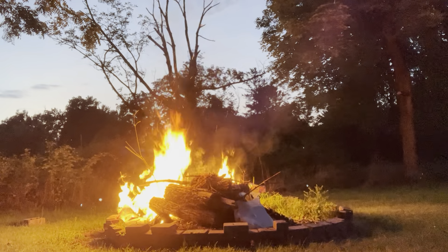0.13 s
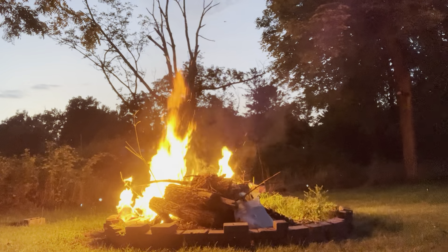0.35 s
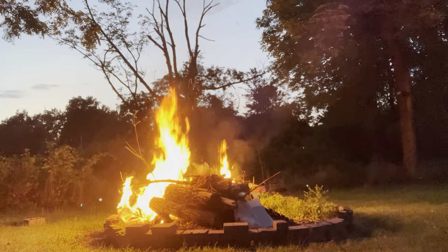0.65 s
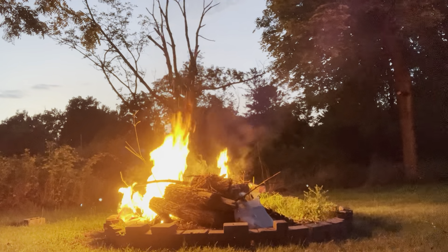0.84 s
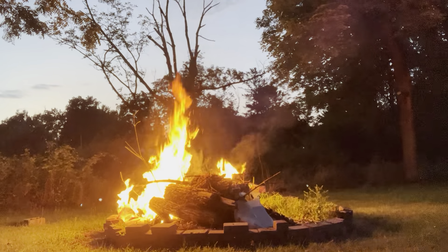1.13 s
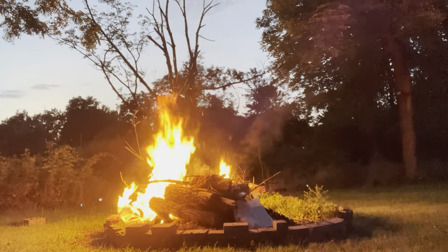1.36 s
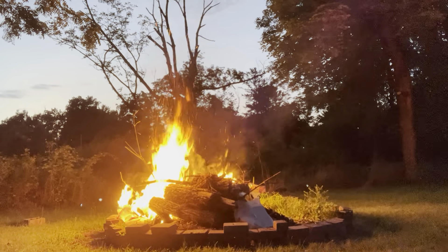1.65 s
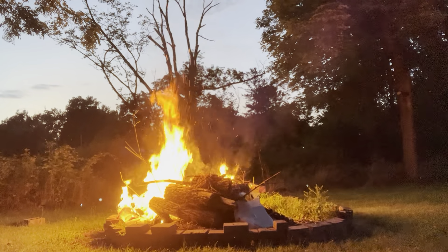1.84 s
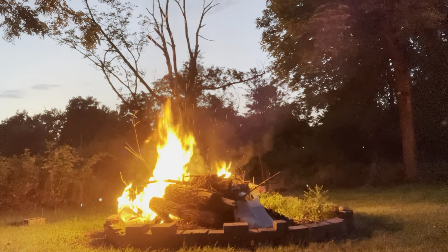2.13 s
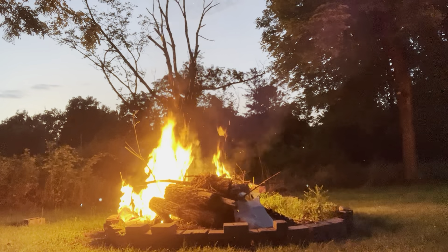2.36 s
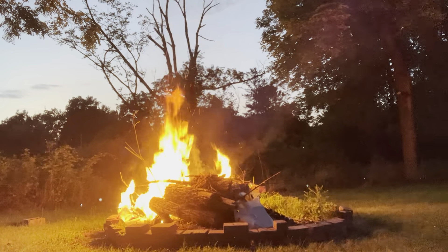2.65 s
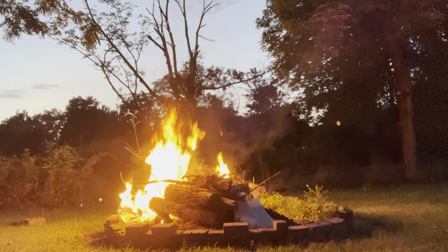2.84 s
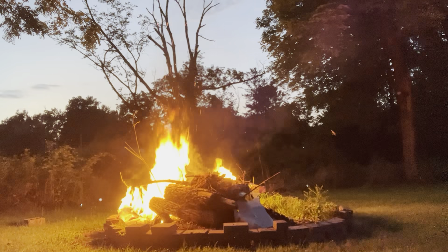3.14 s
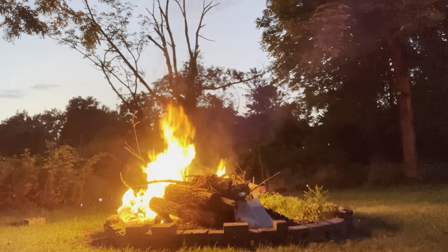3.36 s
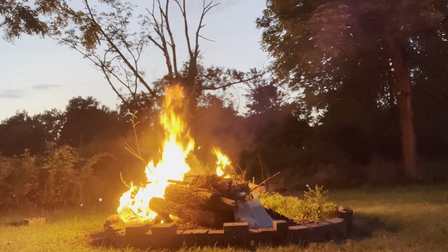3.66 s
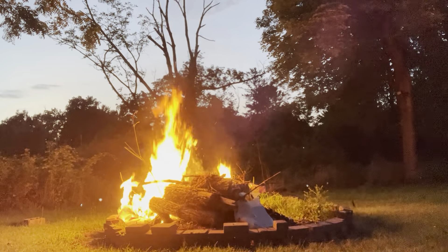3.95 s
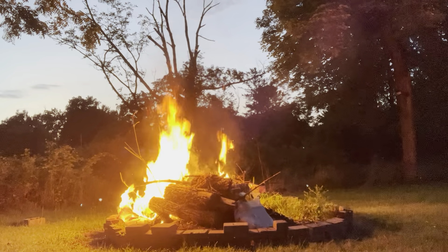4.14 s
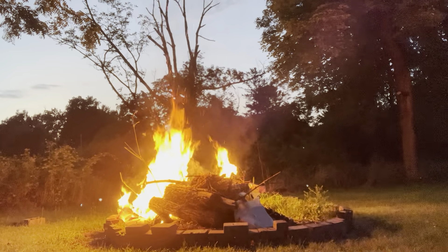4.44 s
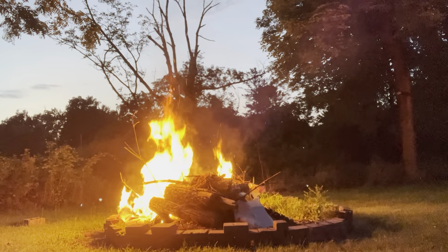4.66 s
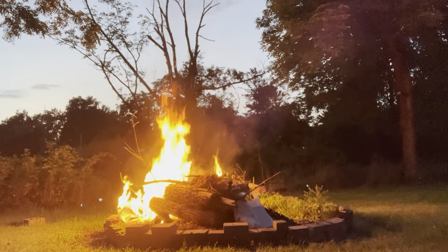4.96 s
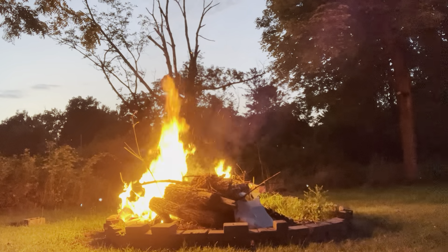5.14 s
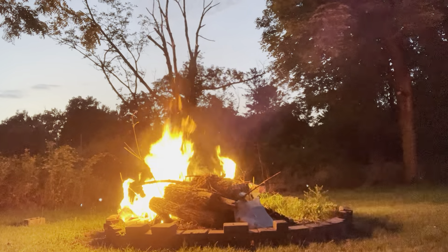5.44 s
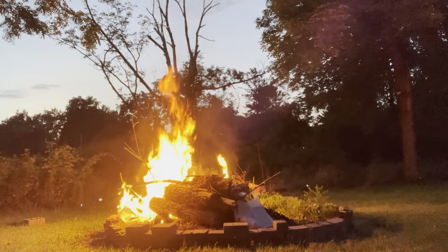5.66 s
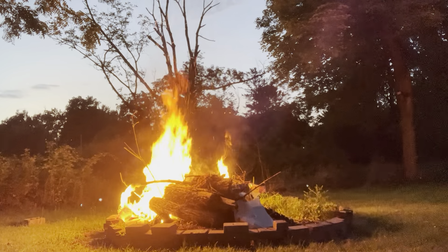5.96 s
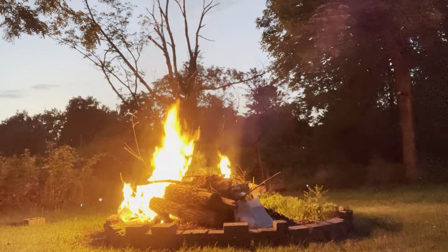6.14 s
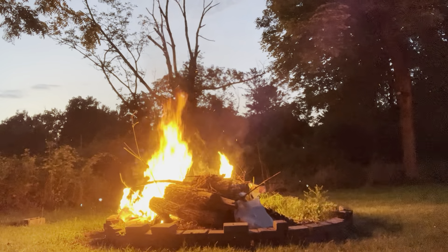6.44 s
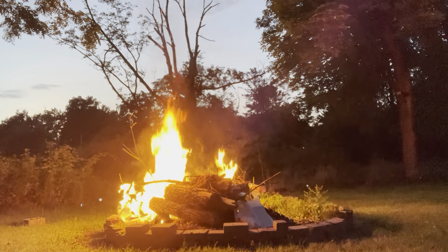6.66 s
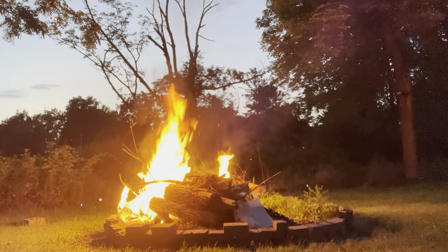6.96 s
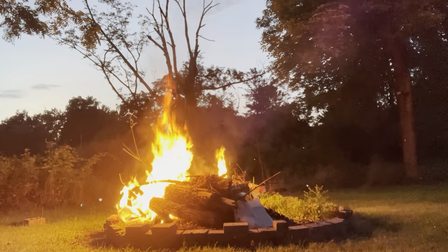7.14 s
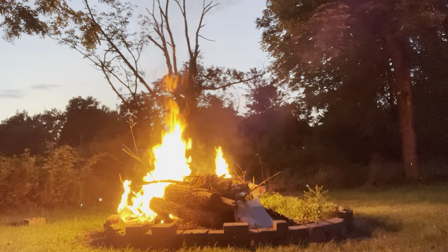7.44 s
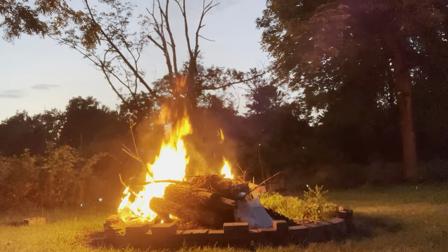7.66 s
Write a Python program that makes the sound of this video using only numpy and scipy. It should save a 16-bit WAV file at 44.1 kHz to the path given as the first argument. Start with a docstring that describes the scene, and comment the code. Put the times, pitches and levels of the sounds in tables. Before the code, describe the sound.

Outdoor fire heard close in stereo: constant tiny crackles, frequent crisp pops with hollow knocks, a quiet bassy flutter of flames and thin sizzling. Strong cracks punctuate the first two seconds, smaller pops fill the middle, two very loud snaps come after five seconds, then it thins somewhat. Leaves scatter the loudest pops into a quick, bright echo; the night air is quiet.

```python
"""In a clearing at dusk, a bonfire of logs and rubbish burns near a phone.
Gas pockets burst in the wood: impulses and short noise ring filters, heard as dry snaps and knocks.
Fine crackle uses many weaker bursts; shaped noise makes the flutter of flames, hiss and night air.
The trees throw each pop back as a bright wash of fading noise.
The phone's limiter holds down the loudest cracks, and a filter cuts the extreme treble."""
import sys
import numpy as np
from scipy import signal
from scipy.fft import rfft, irfft
from scipy.io import wavfile
from scipy.ndimage import uniform_filter1d, minimum_filter1d

SR = 44100
rng = np.random.default_rng(int(sys.argv[2]) if len(sys.argv) > 2 else 0)


def persist_wave(psi):
    """Save psi, clipped to +-1, as 16-bit WAV."""
    counts = np.round(np.clip(psi, -1, 1) * 32767).astype(np.int16)
    wavfile.write(sys.argv[1], SR, np.atleast_2d(counts).T)


N = 343980
TIME = np.arange(N) / SR  # seconds
POP_SIZE = 1024  # samples in one pop
POP_HZ = np.fft.rfftfreq(POP_SIZE, 1 / SR)
LEVEL_SAMPLES = 0.002 * SR  # pop levels are stated as rms over 2 ms
CAVITY_HZ = 1650  # usual pitch of a gas pocket

# Larger bursting pockets: t/s, crack level/dB, knock level/dB, cavity pitch f/Hz,
# level thrown at the trees/dB
POCKETS = [(0.0775, -34, -42, 1924, -68), (0.129, -26.5, -31.5, 3580, -42.5), (0.1533, -35, -46, 1590, -56),
           (0.1658, -33, -42.5, 1900, -51), (0.216, -39.5, -50.5, 1700, -57),
           (0.2975, -28.5, -39.5, 3130, -40), (0.3201, -35.5, -45, 1230, -60),
           (0.4392, -32, -50.5, 1550, -47), (0.456, -40, -48.5, 1900, -62), (0.578, -33, -50, 1420, -61),
           (0.783, -30, -40, 1850, -42), (0.8155, -36, -48, 1600, -64), (0.8681, -42, -44, 1580, -56),
           (0.8868, -39, -40, 2150, -44), (0.8976, -32, -40, 1700, -40), (0.9134, -16, -24, 1760, -23.5),
           (0.982, -27, -37.5, 1600, -54), (1.002, -32, -38, 1560, -35), (1.1905, -36, -43, 1390, -47),
           (1.2267, -35, -29.5, 1230, -38), (1.3881, -25, -32.5, 1620, -33),
           (1.4026, -23, -17, 3210, -24.5), (1.55, -32.5, -35, 1460, -27.5), (1.5599, -30, -52, 1530, -39),
           (1.5704, -32, -61, 1436, -50), (1.73, -49, -41, 1570, -48), (1.738, -31.5, -41, 1540, -48),
           (1.8642, -30.5, -38.5, 2000, -46.5), (2.076, -40, -60, 1770, -62), (2.1572, -40, -47, 2100, -74),
           (2.2877, -39, -43.5, 1140, -52), (2.324, -30, -38, 1770, -51), (2.377, -31, -52, 1800, -53),
           (2.392, -31, -34.5, 1660, -42), (2.4383, -28.5, -45, 2000, -43), (2.4714, -29.5, -34, 1600, -59),
           (2.525, -38, -51, 1960, -46), (2.591, -41, -49, 1400, -49), (2.6274, -36.5, -47, 1600, -61),
           (2.6484, -36, -43, 1590, -50), (2.7472, -42, -52, 1800, -50), (2.7978, -39, -46, 1500, -54),
           (2.8148, -47, -31, 1240, -69), (3.0037, -36.5, -42.5, 1540, -52),
           (3.1383, -35, -50, 2000, -46.5), (3.1495, -34, -54, 1400, -65), (3.18, -41, -49, 1400, -62),
           (3.1925, -31.5, -35.5, 2680, -66), (3.363, -40, -42.5, 2040, -60),
           (3.4373, -38, -43.5, 1820, -49), (3.4805, -45, -43, 1730, -64), (3.5745, -36.5, -58, 1650, -50),
           (3.6306, -39, -45, 1910, -45.5), (3.6764, -37.5, -41.5, 1930, -66),
           (3.8545, -39.5, -52.5, 1770, -53), (3.9078, -43, -43, 1650, -46), (3.929, -36, -58, 1450, -40.5),
           (4.037, -33, -47.5, 1850, -54), (4.0429, -53, -27.5, 1830, -48),
           (4.0915, -28.5, -40, 1390, -41.5), (4.157, -35, -45, 2100, -53),
           (4.162, -38.5, -43, 2000, -44.5), (4.2428, -37.5, -65, 1400, -64),
           (4.3215, -32, -35.5, 1740, -49), (4.3412, -31.5, -43, 1590, -50),
           (4.3629, -33.5, -48, 1880, -49), (4.4218, -24, -32, 1100, -38), (4.53, -43, -40.5, 1740, -59),
           (4.543, -39, -55, 1300, -54), (4.5844, -37.5, -42, 1650, -56), (4.675, -32, -49, 1650, -51),
           (4.7292, -32, -42, 1500, -48), (4.787, -39, -40.5, 1440, -46), (4.8133, -40.5, -50, 1760, -50),
           (4.953, -31.5, -30, 1940, -42.5), (5.262, -39, -41.5, 1500, -50), (5.305, -40, -48.5, 1890, -59),
           (5.3893, -14.5, -15.5, 1930, -27), (5.4235, -30, -35, 1700, -52), (5.5147, -40, -45, 1900, -52),
           (5.5318, -15, -24.5, 2080, -29.5), (5.5674, -27.5, -38, 1240, -37),
           (5.697, -40, -52.5, 1550, -64), (5.7887, -42, -40, 1800, -46), (5.89, -28.5, -33, 2280, -43.5),
           (5.915, -38, -40.5, 1920, -54), (5.967, -52, -44.5, 1450, -64), (6.1112, -44.5, -34, 1460, -45),
           (6.266, -35, -39, 2430, -45.5), (6.4088, -36.5, -46, 1830, -42.5),
           (6.5918, -26.5, -38, 1640, -46), (6.7948, -37.5, -50.5, 2500, -53),
           (6.8511, -37, -51.5, 1720, -60), (6.8675, -39.5, -47.5, 1540, -53),
           (6.896, -40.5, -60, 1700, -60), (6.946, -33, -38, 1710, -52), (6.9848, -38, -51, 2200, -66),
           (7.0842, -25.5, -29.5, 1010, -40.5), (7.2964, -35.5, -45.5, 2000, -50),
           (7.352, -35.5, -37.5, 1760, -36.5), (7.3866, -43, -46, 1710, -57), (7.4107, -29, -39, 1790, -62),
           (7.4772, -40, -49, 1890, -57), (7.4811, -29, -49.5, 1810, -48), (7.777, -36, -45, 1750, -31)]
# Hiss level over time, rising and falling slowly: t/s, level before trim and flicker/dB
HISS_LEVEL = [(0.0, -63), (0.49, -63.5), (1.54, -58.5), (2.1, -63), (2.55, -62), (2.83, -62.5), (4.35, -65),
              (5.23, -63), (5.49, -62), (6.11, -67.5), (7.4, -62), (7.7, -68.5)]


def undb(db):
    """Turn decibels into gain."""
    return 10 ** (np.asarray(db) / 20)


def unit(x):
    """Scale a sound to rms 1."""
    return x / np.sqrt(np.mean(x ** 2))


def curve(rows):
    """Join a table of times and values by straight lines."""
    return np.interp(TIME, *np.transpose(rows))


def response(points, size):
    """Read a frequency and dB table as gain on the bins of a transform."""
    hz, db = np.transpose(points)
    bins_hz = np.fft.rfftfreq(size, 1 / SR)
    return undb(np.interp(np.log(bins_hz + 1), np.log(hz), db))


def colour(x, points):
    """Filter a long signal by a spectrum."""
    size = x.shape[-1]
    return irfft(rfft(x) * response(points, size), size)


def causal(points):
    """Give a spectrum minimum phase, so that it rings only after the blow."""
    cepstrum = irfft(np.log(response(points, POP_SIZE)))
    # fold the half that lies before the blow onto the half after it
    cepstrum[1:POP_SIZE // 2] *= 2
    cepstrum[POP_SIZE // 2 + 1:] = 0
    return np.exp(rfft(cepstrum, POP_SIZE))


def walk(rate_hz):
    """Drift by chance with rms 1: random levels are held, then smoothed twice."""
    hold = int(SR / rate_hz)
    held = np.repeat(rng.standard_normal(N // hold + 1), hold)
    smooth = uniform_filter1d(uniform_filter1d(held, hold), hold)
    return unit(smooth[:N])


def add(out, s, sound):
    """Mix in a short stereo sound at a time in seconds."""
    start = max(int(s * SR), 0)
    out[:, start:start + sound.shape[1]] += sound[:, :max(N - start, 0)]


def flames(level_db=-47, apart_db=-16.0, flutter_db=0.9, flutter_hz=14, lean_db=1.35):
    """Turbulent burning gives a low fluttering roar, nearly the same at both ports."""
    # Roar spectrum: f/Hz, relative level per Hz/dB
    roar_spectrum = [(20, -14), (31, -18), (40, -17.5), (52, 4), (66, 1.5), (82, 1), (105, -3), (160, -8.5),
                     (250, -16.5), (400, -28), (700, -47.5), (1500, -54.5)]
    shared = rng.standard_normal(N)
    separate = undb(apart_db) * rng.standard_normal((2, N))
    roar = unit(colour(shared + separate, roar_spectrum))
    left_right_db = lean_db * np.array([[1], [-1]])
    return roar * undb(level_db + flutter_db * walk(flutter_hz) + left_right_db)


def licks(level_db=-70, centre_hz=1000, width_hz=500, flutter_db=4.0, flutter_hz=14):
    """Tongues of flame brush past the logs with a soft, uneven rush of band-limited noise."""
    band = signal.iirpeak(centre_hz, centre_hz / width_hz, fs=SR)
    rush = unit(signal.filtfilt(*band, rng.standard_normal((2, N))))
    return rush * undb(level_db + flutter_db * walk(flutter_hz))


def sizzle(trim_db=-1.0, grain_db=3, flicker_db=1.8, flicker_hz=25):
    """Steam and gas hiss out of the wood as grainy noise with an uneven level."""
    # Hiss spectrum: f/Hz, relative level per Hz/dB
    hiss_spectrum = [(1500, 14.5), (3000, 10.5), (5000, 7.5), (7500, 3.5), (10000, 5), (12300, 5.5),
                     (14000, -1), (16000, -48)]
    noise = rng.standard_normal((2, N))
    grains = noise * undb(grain_db * rng.standard_normal(N))
    level_db = curve(HISS_LEVEL) + trim_db + flicker_db * walk(flicker_hz)
    return unit(colour(grains, hiss_spectrum)) * undb(level_db)


def night(air_db=-57.5, sway_db=0.7, band_hiss_db=-77, band_hiss_hz=5650, width_hz=600, pulse_db=2):
    """The outdoor air murmurs as shaped noise, with a faint, narrow band of hiss near 5.6 kHz."""
    # Night air spectrum: f/Hz, relative level per Hz/dB
    air_spectrum = [(100, 11.5), (300, -1), (600, -0.5), (1000, -0.5), (1500, -8.5), (2200, -13.5),
                    (3500, -33), (6000, -49), (14000, -33)]
    murmur = unit(colour(rng.standard_normal((2, N)), air_spectrum))
    air = murmur * undb(air_db + sway_db * walk(15.0))
    band = signal.iirpeak(band_hiss_hz, band_hiss_hz / width_hz, fs=SR)
    band_hiss = unit(signal.filtfilt(*band, rng.standard_normal((2, N))))
    return air + band_hiss * undb(band_hiss_db + pulse_db * walk(2.7))


def crackle(count=560, faint_db=-58, spread_db=4.5, most_db=-45.5, knock_db=-8, tone_db=14,
            echo_db=-13, cluster_s=0.05, cluster_share=0.45, hiss_share=0.78):
    """List small pockets: some burst beside larger ones; they grow stronger where the hiss is louder."""
    chance, size, tone, pitch, pick, offset = rng.random((count, 6)).T
    neighbour = (chance * len(POCKETS)).astype(int)
    beside = np.array(POCKETS)[neighbour, 0] + cluster_s * (2 * offset - 1)
    when = np.where(pick < cluster_share, beside, chance * N / SR)
    when = np.clip(when, 0, TIME[-1])
    hiss_rise_db = np.interp(when, *np.transpose(HISS_LEVEL)) - curve(HISS_LEVEL).mean()
    # most are faint and few are strong
    strength_db = faint_db + hiss_share * hiss_rise_db - spread_db * np.log(1 - size)
    strength_db = np.minimum(strength_db, most_db)
    dull_db = tone_db * (tone - 0.5)  # more knock, less crack
    cavity_hz = CAVITY_HZ * 2 ** (pitch - 0.5)
    return np.transpose([when, strength_db - dull_db / 2, strength_db + knock_db + dull_db,
                         cavity_hz, strength_db + echo_db])


def ports(hz, low_left_db=2.5, notch_hz=3400, notch_db=-5, shade_hz=7000, shade_db=-4.0):
    """The phone's body tips pops left in the bass and right in the treble, and weakens one band."""
    # Delay of pops at the right port: f/Hz, phase lag/radians
    port_phase = [(0, 0), (1500, 0), (3200, 1.2), (4000, 1), (5200, 2.4), (6400, 2.5), (7500, 4.5),
                  (10500, 6.7), (13000, 8.6), (15500, 10.2)]
    lag = np.exp(-1j * np.interp(hz, *np.transpose(port_phase)))
    bass_db = low_left_db * np.exp(-hz / 1000)
    treble_db = shade_db * np.exp(-((hz - shade_hz) / 1400) ** 2)
    lean = undb(bass_db + treble_db)  # the right port gets the inverse
    notch = undb(notch_db * np.exp(-((hz - notch_hz) / 500) ** 2))
    return notch * np.array([lean, lag / lean])


def cavity(knock_hz, knock_q, skirt):
    """A gas pocket is a broad resonance that radiates poorly below its pitch."""
    u = 1j * POP_HZ / knock_hz
    resonance = u / (1 + u / knock_q + u * u)
    radiation = u / (1 + u + u * u)
    low_cut = u * u / (skirt ** 2 + skirt * u + u * u)
    return resonance * radiation * low_cut


def bursts(rows, tear=0.4, knock_q=0.8, skirt=0.69, blur_db=-14, blur_ms=5.3):
    """Each pocket opens with an impulse and a short tearing of fibres, which ring the wood around it."""
    # Crack, snap and thud spectra, each: f/Hz, relative level/dB
    crack_spectrum = [(4500, -35), (7000, -9), (8700, -1), (10200, -.5), (12300, 0), (14200, -3),
                      (15700, -5.5), (16500, -12)]
    snap_spectrum = [(2200, -37), (3400, 1), (4300, 13), (5800, 11), (7200, -1), (9500, -17)]
    thud_spectrum = [(90, -20), (250, 5), (450, 5.5), (750, -1.5), (1000, -3.5), (1300, 6), (2500, -75.5)]
    usual_crack_db = -30
    # a split-off splinter rings within the crack, by 1 dB more per dB of strength
    splinter_hz, splinter_width_hz, splinter_db, splinter_growth = 9650, 2300, -9, 1
    # the snap's level lies between crack and knock, plus a small lift
    snap_lift_db, snap_knock_share = 0.82, 0.69
    # larger, lower cavities thud more: dB against the knock, dB per octave down
    thud_offset_db, thud_db_per_octave = -13, 16
    # usual tearing decay in ms, random spread in octaves, dB of crack strength that halve it
    usual_tear_ms, tear_octaves, tear_halving_db = 0.96, 0.28, 33

    out = np.zeros((2, N))
    ms = 1000 * np.arange(POP_SIZE) / SR
    crack, snap, thud = causal(crack_spectrum), causal(snap_spectrum), causal(thud_spectrum)
    direct = ports(POP_HZ)
    damping = 1j * POP_HZ * splinter_width_hz
    splinter = damping / (splinter_hz ** 2 - POP_HZ ** 2 + damping)
    for s, crack_db, knock_db, knock_hz, _ in rows:
        strength_db = crack_db - usual_crack_db
        ring = 1 + splinter * undb(splinter_db + splinter_growth * strength_db)
        snap_db = snap_lift_db + crack_db + snap_knock_share * (knock_db - crack_db)
        octaves_down = np.log2(CAVITY_HZ / knock_hz)
        thud_db = thud_offset_db + knock_db + thud_db_per_octave * octaves_down
        octaves = tear_octaves * rng.standard_normal() - strength_db / tear_halving_db
        tear_ms = usual_tear_ms * 2 ** octaves
        chance = rng.standard_normal((3, POP_SIZE))
        tearing = tear * chance[0] * np.exp(-ms / tear_ms) / np.sqrt(1 + tear_ms)
        push = rfft((ms == 0) + tearing)
        knock = cavity(knock_hz, knock_q, skirt)
        # a short faint noise tail blurs each pop, differently in each channel
        blur = unit(chance[1:] * np.exp(-ms / blur_ms))
        paths = direct * (1 + undb(blur_db) * rfft(blur) / np.sqrt(POP_SIZE))
        parts = ((crack * ring, crack_db), (snap, snap_db), (knock, knock_db), (thud, thud_db))
        pop = sum(undb(db) * unit(irfft(push * body * paths)) for body, db in parts)
        add(out, s, pop * np.sqrt(LEVEL_SAMPLES / POP_SIZE))
    return out


def trees(rows, arrive_s=0.027, t60=0.24, late_db=-25, late_t60=0.91, near_db=-20, near_t60=0.099):
    """Grass scatters a little of each pop at once; the wall of leaves answers later and dies away."""
    # Foliage spectrum: f/Hz, relative level/dB
    foliage_spectrum = [(200, 2), (1700, -15), (3000, 1.5), (4500, 3), (5700, 6), (7500, 3), (10000, 6.5),
                        (12800, 1.5), (14200, -35), (16000, -44)]
    thrown = np.zeros((1, N))
    places = np.clip((rows[:, 0] * SR).astype(int), 0, N - 1)
    thrown[0, places] = undb(rows[:, -1]) * np.sqrt(LEVEL_SAMPLES)
    t = np.arange(SR) / SR
    arrival = 1 / (1 + (arrive_s / (t + 1e-4)) ** 4)
    # each t60 is the time in seconds to fade by 60 dB
    leaves = arrival * (undb(-60 * t / t60) + undb(late_db - 60 * t / late_t60))
    grass = undb(near_db - 60 * t / near_t60)
    wash = colour(rng.standard_normal((2, SR)), foliage_spectrum)
    echo = unit((leaves + grass) * wash) / np.sqrt(SR)
    return signal.fftconvolve(thrown, echo, axes=1)[:, :N]


def scene():
    """Mix the fire, its echo and the night around it."""
    pockets = np.vstack([POCKETS, crackle()])
    pops = bursts(pockets) + trees(pockets)
    return pops + flames() + licks() + sizzle() + night()


def limiter(x, ceiling_db=-2.5, release_s=0.0063):
    """The gain drops just ahead of a peak above the ceiling and recovers within milliseconds."""
    over = np.log(np.maximum(np.abs(x).max(axis=0) / undb(ceiling_db), 1))
    # hold each excess while it fades exponentially
    fall = TIME / release_s
    held = np.exp(np.maximum.accumulate(np.log(over + 1e-12) + fall) - fall)
    # looking ahead by a few samples lets the gain move smoothly
    early = minimum_filter1d(np.exp(-held), size=33)
    return x * uniform_filter1d(early, size=33)


def record(dry, top_hz=16300):
    """The phone limits the loudest cracks and steeply cuts the top of the treble."""
    top_cut = signal.ellip(8, 0.2, 70, top_hz, fs=SR, output="sos")
    return signal.sosfilt(top_cut, limiter(dry))


dry = scene()
out = record(dry)
persist_wave(out)
```